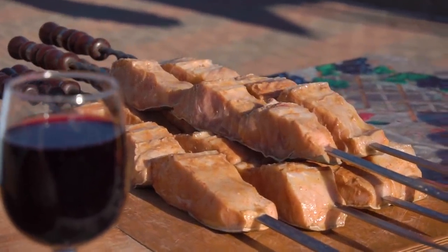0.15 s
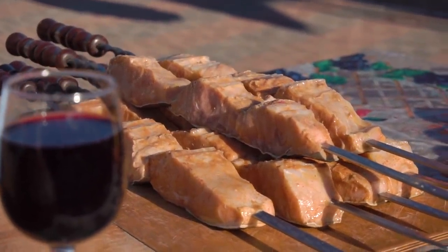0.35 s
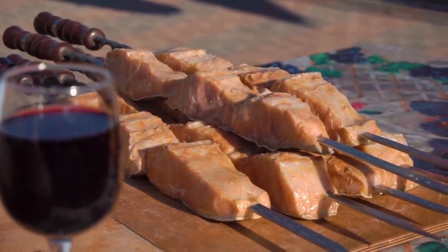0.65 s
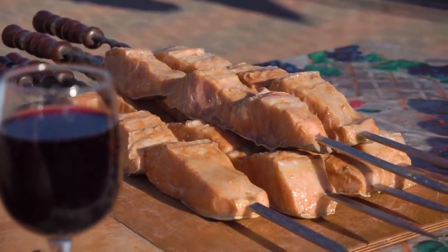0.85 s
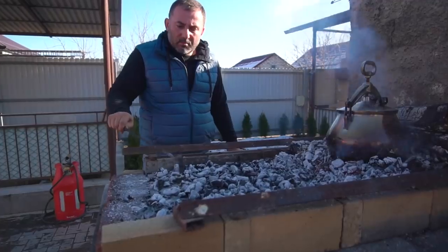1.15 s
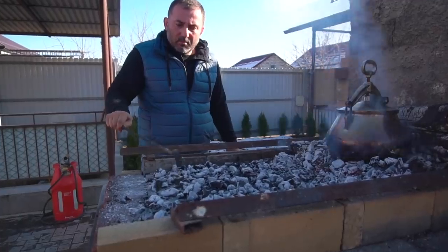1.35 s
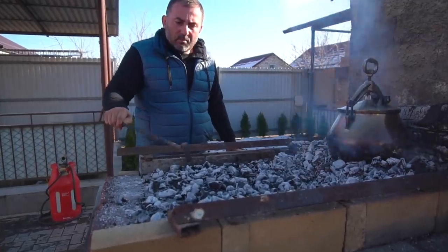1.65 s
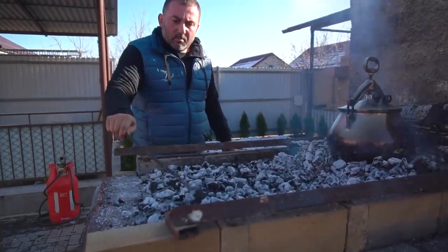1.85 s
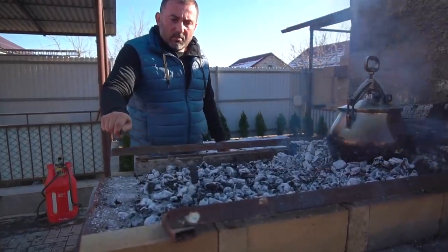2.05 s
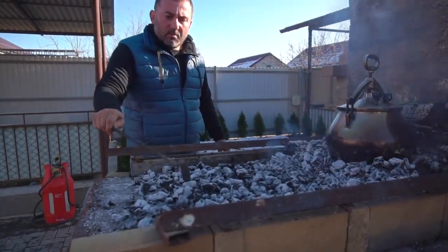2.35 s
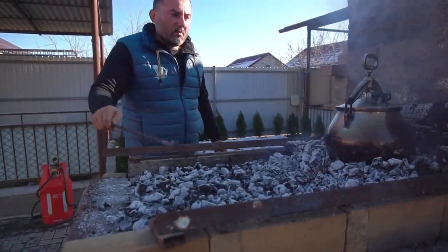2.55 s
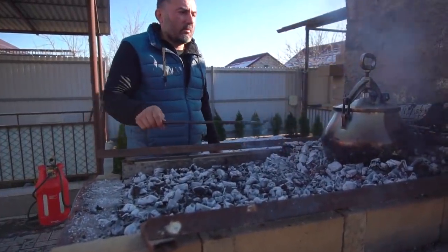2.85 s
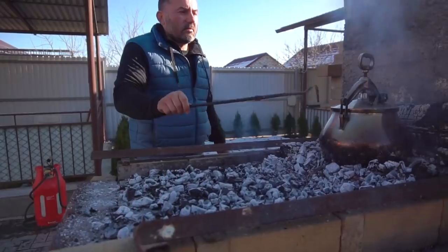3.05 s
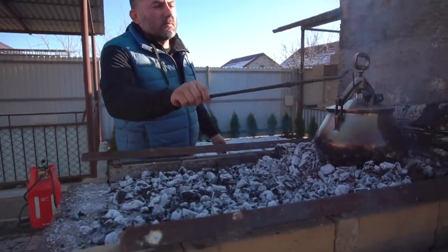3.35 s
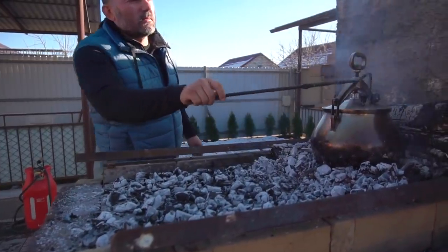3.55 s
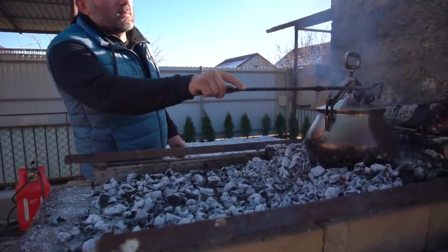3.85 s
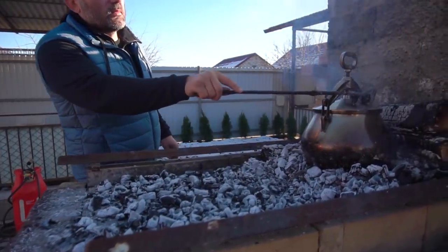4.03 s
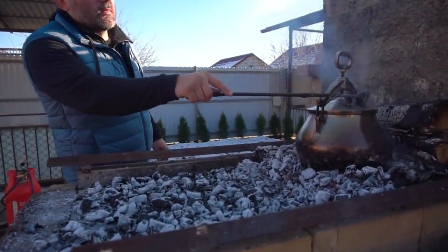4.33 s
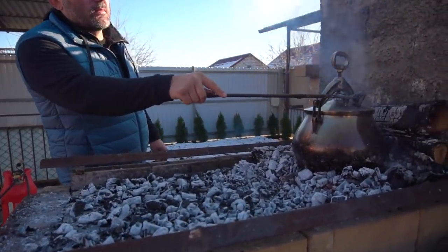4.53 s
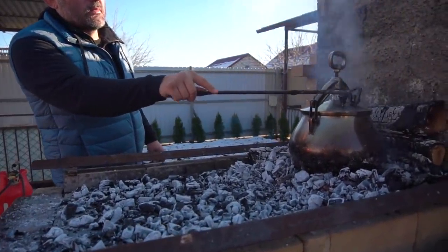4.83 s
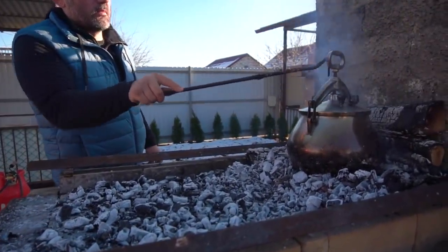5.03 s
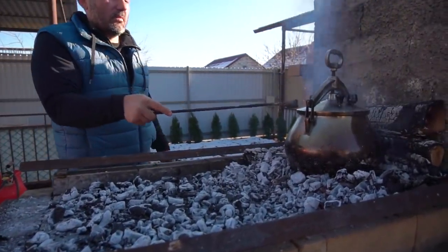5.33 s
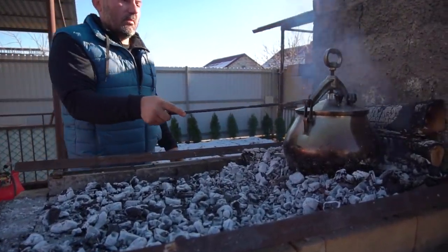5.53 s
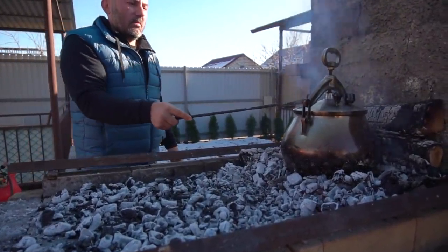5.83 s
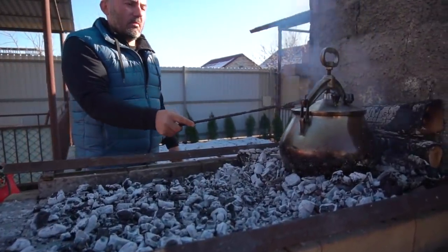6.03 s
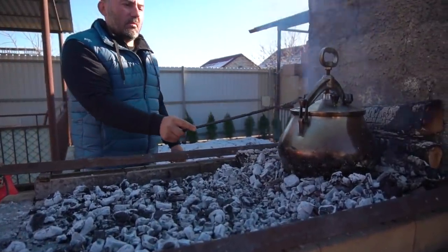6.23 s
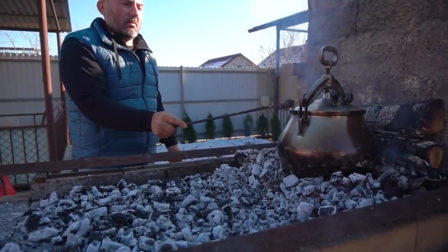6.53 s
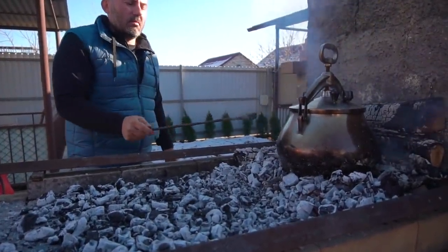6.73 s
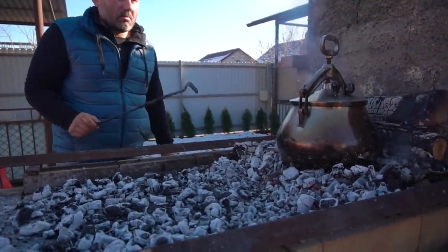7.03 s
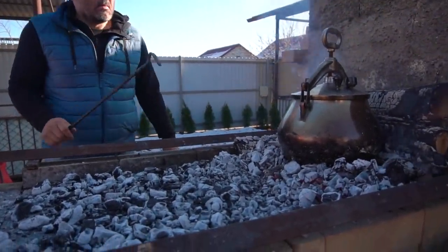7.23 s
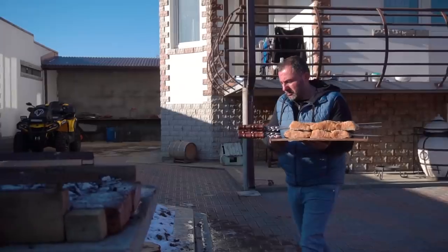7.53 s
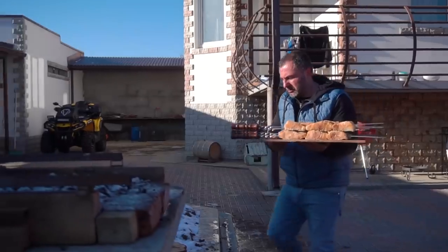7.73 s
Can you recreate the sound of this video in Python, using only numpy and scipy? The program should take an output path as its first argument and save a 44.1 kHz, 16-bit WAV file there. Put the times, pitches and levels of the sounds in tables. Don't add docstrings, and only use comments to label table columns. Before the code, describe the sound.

Quiet outdoor hum with ember ticks, then a cauldron hisses steam while a poker crunches coals and taps metal, releasing two roaring steam bursts.

```python
import sys
import numpy as np
from scipy import signal
from scipy.fft import rfft, irfft, next_fast_len
from scipy.io import wavfile
from scipy.ndimage import map_coordinates

SR = 44100
rng = np.random.default_rng(int(sys.argv[2]) if len(sys.argv) > 2 else 0)


def nominal_scale(level):
    x = np.asarray(level, float) / 20
    return 10 ** x


def log_audio(samples):
    frames = np.atleast_2d(samples).T
    limited = np.clip(frames, -1, 1)
    pcm = np.round(limited * 32767).astype(np.int16)
    wavfile.write(sys.argv[1], SR, pcm)


N = 347688
GRILL_S, FAR_S = 0.957, 7.51

# start_s, level_db
LEAK = [(0.96, -35), (1.1, -37.5), (1.48, -39.5), (1.65, -38), (2.2, -36), (2.48, -42.5), (2.63, -39),
        (2.76, -41), (3.0, -35.5), (3.27, -34.5), (3.7, -37), (3.9, -39.5), (4.9, -34.5), (5.35, -33.5),
        (5.6, -29.5), (6.5, -35), (7.45, -35), (7.6, -41)]
# start_s, held_s, level_db, release_s, yard_sinks_db
LIFTS = [
    (4.05, 0.022, -25.5, 0.026, -1),
    (4.104, 0.1, -33.5, 0.06, 0),
    (4.281, 0.585, -21.5, 0.03, 11.5),
    (5.631, 0.835, -20.5, 0.04, 4.5),
]
# middle_s, half_width_s, loss_db
CHOKES = [(4.26, 0.025, 2), (4.3, 0.025, -3), (4.333, 0.01, 6), (4.36, 0.04, -1.5), (5.636, 0.006, -3),
          (5.659, 0.011, 11), (5.69, 0.09, 3.5), (6.14, 0.08, 2), (6.44, 0.03, 2), (7.11, 0.06, -2.5)]
# pitch_hz, level_db (per Hz)
LEAK_COLOUR = [(710, -37), (1200, -12), (1460, -15.5), (2590, -17.5), (2890, -12), (3590, -11), (4500, -13),
               (4960, -7), (5710, -1.5), (6370, -5.5), (8630, -8), (10300, -21.5), (12700, -17.5),
               (14700, -11), (16000, -7)]
# pitch_hz, level_db (per Hz)
FAR_COLOUR = [(710, -40), (1200, -12), (3470, -11), (5300, 0), (7020, -3), (10500, -10), (13500, -13.5),
              (16000, -8)]
# pitch_hz, level_db (per Hz)
ROAR_COLOURS = [
    [(530, -70), (900, -39), (1280, -25), (2140, -25), (3960, -17.5), (4310, -17), (4740, -12), (5220, -8.5), (6640, 0), (11400, -5.5), (15100, 1.5), (16000, -12)],
    [(530, -59), (900, -32), (1120, -24.5), (3110, -16.5), (3550, -9.5), (3960, -10), (4410, -8.5), (6110, -0.5), (8050, 3), (11300, -11.5), (15100, -1), (16000, -13)],
]
# start_s, lag_ms, strength (0-1)
RIM_ECHO = [(0.94, 1.004, 0.4), (1.29, 1.004, 0.45), (1.55, 0.98, 0.5), (1.99, 1.056, 0.5),
            (2.42, 1.072, 0.38), (2.7, 1.022, 0.35), (3.15, 1.014, 0.28), (3.55, 1.092, 0.3),
            (3.95, 1.078, 0.15), (4.25, 1.036, 0.46), (5.0, 1.046, 0.48), (5.62, 1.012, 0.44),
            (5.66, 1.158, 0.4), (5.99, 1.104, 0.5), (6.4, 1.156, 0.22), (7.46, 1.192, 0.38),
            (7.5, 0.956, 0.2), (7.73, 0.964, 0.3)]
# extra_lag_ms, share (of its strength)
SIDE_ECHOES = [(0.179, 0.48), (-0.19, 0.25), (-0.276, 0.25), (0.882, 0.3)]
CRUNCH = {3.5: [(1.8989, -9.5, 660, -27.5, 1090), (1.9081, -10, 580, -24.5, 2200),
          (3.3237, -19.5, 267, -32, 2150), (1.2405, -9, 600, -27.5, 1640), (1.5235, -30, 202, -32, 2200),
          (1.5262, -16, 333, -27.5, 1140)], -6.5: [(1.9036, -13, 556, -27, 1500),
          (2.207, -18, 590, -24, 1320), (2.2208, -16.5, 560, -22.5, 2100), (3.2898, -22, 359.6, -27, 1230),
          (3.617, -25, 506, -33, 902), (7.522, -27, 280, -26.5, 1910), (1.2431, -9, 283, -25, 2190)]}
# start_s, grit_db, thud_hz, thud_db, knock_db
TAPS = [(4.0514, -28, 530, -29.5, -25), (4.0678, -30, 471, -33, -27), (4.106, -20, 466, -36, -29),
        (4.218, -44, 363, -52, -39), (4.85, -24, 361, -36, -33), (5.5043, -6.5, 482, -49, -10),
        (5.5466, -41, 474, -30.5, -26), (5.6307, -13, 377, -19, -16), (5.641, -18, 264, -43, -37),
        (6.424, -21.5, 172, -33, -23.5), (6.4445, -25, 248, -45, -32), (6.4607, -25, 180, -41, -25),
        (6.4743, -20.5, 312, -35, -27)]
# pitch_hz, level_db, fade_s (time to fall 60 dB)
LID_NOTES = [(305, -41, 0.78), (474, -21, 0.31), (893, -22.5, 0.14), (1246, -6, 0.084), (1383, -1.5, 0.031),
             (1585, -5, 0.024), (1810, 3.5, 0.015), (2170, -10, 0.015), (2436, -6.5, 0.057),
             (2950, -7, 0.056), (3360, -8.5, 0.036)]
TICKS = {(11000, 0.008): [(0.4316, -32, 1700, -14), (0.4547, -16.5, 1610, -8.5), (0.4579, -18, 1500, -21),
         (0.463, -25.5, 1500, -12), (0.466, -27.5, 1900, -7), (0.4844, -32, 1860, -14),
         (0.5213, -22, 1560, -23), (0.6964, -40, 1750, -14), (0.7157, -25.5, 1500, -14),
         (0.7204, -30, 1720, -14), (2.0328, -24, 4970, -18), (2.559, -25, 3530, -4),
         (2.9901, -19.5, 4600, -8), (5.724, -14.5, 4460, -11), (7.01, -24, 5130, -1)],
         (4500, 0.011): [(1.3124, -28, 1360, -3.5), (2.0024, -34, 2950, -5), (4.8564, -29, 2910, 6.5),
         (7.3435, -30.5, 1640, 0), (7.562, -20, 1720, -6), (7.5862, -28, 1730, -5), (7.691, -20, 2310, -6)],
         (7900, 0.031): [(7.4775, -10, 4300, -22)]}
# start_s, length_s, level_db, low_hz, top_hz
SCUFFS = [(3.288, 0.045, -36, 240, 620), (3.581, 0.19, -39, 330, 800), (7.52, 0.11, -40.5, 140, 2400),
          (5.545, 0.031, -40, 550, 1500), (6.425, 0.1, -41, 1300, 3000), (3.2, 0.26, -45, 1400, 4400),
          (3.55, 0.22, -44, 1500, 4900), (6.72, 0.42, -46, 1500, 4700), (2.88, 0.55, -47, 12500, 16000),
          (7.525, 0.2, -44, 130, 420), (1.65, 0.6, -50, 13000, 16000), (2.62, 0.4, -56, 2830, 2990)]
# start_s, rumble_db, hum_db
SPOTS = [
    (0, -30, -42),
    (0.96, -40.5, -48),
    (7.5, -40, -46),
]
# start_s, level_db
TRAFFIC = [(0.96, -1), (1.4, -3.5), (2.5, 0.5), (3.5, 2), (3.9, -2), (4.3, 1), (6.7, -3), (7.5, 1.5),
           (7.88, -2)]
# middle_s, half_width_s, loss_db
LULLS = [(0.03, .05, 4), (0.67, .05, 4.5), (0.9, .06, -4), (1.05, .08, 4), (1.53, .08, 14), (1.83, .04, 6),
         (2.43, .05, 5), (3.2, .05, 6), (3.35, .1, -3), (5.2, .07, 12), (5.45, .12, -4), (5.73, .05, 8),
         (6.1, .12, 8), (6.6, .15, 9), (6.35, .08, 8), (6.87, .04, 6), (7.29, .04, 9), (7.52, .05, 4)]
# pitch_hz, level_db (per Hz)
TABLE_HUM = [(35, -29), (60, 0), (148, -6), (214, -12), (309, -12), (347, -14), (408, -11), (539, -12),
             (1030, -10), (2010, -27), (2840, -31), (5180, -33.5), (7330, -32), (15000, -47.5)]
# pitch_hz, level_db (per Hz)
GRILL_HUM = [(35, -37), (60, -1), (195, -5), (226, -0.5), (270, -5.5), (303, -1), (340, -3), (823, -3),
             (893, -0.5), (1720, -13.5), (2590, -14.5), (3000, -7.5), (3900, -42), (6600, -120)]
# pitch_hz, level_db
EMBER_TONES = [(306.8, -59.5), (549.1, -80), (2207, -69.5), (2907, -65)]
# pitch_hz, level_db (per Hz)
RUMBLE = [(12, 1), (20, -4), (31, -3.5), (44, -17), (56, -17.5), (75, -31)]


def steam():
    core_db, swing_db = valve()
    white = rng.standard_normal(N)
    puffs_db = drift(220)
    jet = with_echo(white * nominal_scale(puffs_db))
    opening = np.clip((core_db + 28.5) / 10, 0, 1)
    near = np.arange(N) < FAR_S * SR
    first_lift = np.arange(N) < 5.2 * SR
    low_db = -15 - 0.5 * opening - 0.75 * swing_db
    top_db = -7.5 + 0.5 * opening - 0.3 * swing_db + 1.5 * ~near
    out = 0
    for low_hz, high_hz, db in [(900, 4500, low_db), (4500, 10000, 0), (10000, 17000, top_db)]:
        first, second = [coloured(jet, colour, low_hz, high_hz) for colour in ROAR_COLOURS]
        roar = np.where(first_lift, first, second)
        near_leak = coloured(jet, LEAK_COLOUR, low_hz, high_hz)
        far_leak = coloured(jet, FAR_COLOUR, low_hz, high_hz)
        leak = np.where(near, near_leak, far_leak)
        out = out + nominal_scale(db) * ((1 - opening) * leak + opening * roar)
    out = mottled(out, patchy_db=2.5, rate_hz=3.2)
    flutter_db = 0.6 * drift(17)
    return out * nominal_scale(core_db + flutter_db) * (np.arange(N) >= GRILL_S * SR)


def valve():
    t = np.arange(N) / SR
    leak_db = in_time(LEAK)[0]
    lifted = 0
    for s, held, db, release, _ in LIFTS:
        times = [-1e-3, 0, 0.005, held, held + release, held + release + 0.01]
        shape_db = np.interp(t - s, times, [-80, -22, 0, 0, -22, -80])
        lifted = lifted + nominal_scale(2 * (db + shape_db))
    power = nominal_scale(2 * leak_db) + lifted
    choke_db = dips(CHOKES)
    swing_db = (leak_db + 37) * (1 - lifted / power) + choke_db
    return 10 * np.log10(power) + choke_db, swing_db


def with_echo(x):
    lag_ms, strength = in_time(RIM_ECHO)
    lag_ms = lag_ms + 0.009 * drift(11)
    dull_hz = 9300
    dull = signal.sosfilt(signal.butter(2, dull_hz, fs=SR, output="sos"), x)
    filter_ms = 215 / dull_hz

    def late(ms):
        return map_coordinates(dull, [np.arange(N) - (ms - filter_ms) * SR / 1000], order=3)

    bounces = late(lag_ms)
    for extra_ms, share in SIDE_ECHOES:
        bounces = bounces + share * late(lag_ms + extra_ms)
    return x + 1.12 * strength * bounces


def mottled(x, patchy_db, rate_hz):
    size = next_fast_len(N)
    spectrum = rfft(x, size)
    place = np.arange(size // 2 + 1) * SR / size / 1200
    out = np.zeros(N)
    for k in range(15):
        hill = np.clip(1 - np.abs(place - k), 0, 1)
        out += nominal_scale(patchy_db * drift(rate_hz)) * irfft(spectrum * hill, size)[:N]
    return out


def blows(table, grit_hz, grit_s, tail, thud_cycles, knock_cycles):
    t = np.arange(SR // 4) / SR
    out = np.zeros(N + SR)
    for s, grit_db, thud_hz, thud_db, knock_hz, knock_db in table:
        draw = rng.standard_normal((2, len(t)))
        uneven = draw[0] * (0.3 + (np.abs(draw[1]) > 1.9))
        clicks = uneven * (np.exp(-(t / grit_s) ** 2) + tail * np.exp(-t / 0.014))
        grit = band(clicks, 1390, 1.44 * grit_hz) + 0.46 * band(clicks, 0.64 * grit_hz, 1.28 * grit_hz)
        add(out, s, grit, grit_db)
        thud = ring(clicks, thud_hz, thud_cycles / thud_hz) + 0.3 * band(clicks, 120, 800)
        add(out, s, thud, thud_db)
        knock = band(ring(clicks, knock_hz, knock_cycles / knock_hz), 480, 4400)
        add(out, s, knock + 0.23 * band(clicks, 700, 2500), knock_db)
    return out[:N]


def lid():
    taps = np.array(TAPS)
    at = np.round(taps[:, 0] * SR).astype(int)
    out = np.zeros(N)
    spread_db = 3.1 * rng.standard_normal((len(taps), len(LID_NOTES)))
    for k, (hz, db, fade_s) in enumerate(LID_NOTES):
        tap_db = taps[:, 4] if hz < 2000 else taps[:, 1]
        clicks = np.zeros(N)
        clicks[at] = nominal_scale(tap_db + db - 6.5 + spread_db[:, k])
        out += (-1) ** k * ring(clicks, hz, fade_s)
    return out


def ticks():
    t = np.arange(SR // 10) / SR
    out = np.zeros(N + SR)
    for (top_hz, fade_s), rows in TICKS.items():
        for s, db, ring_hz, ring_db in rows:
            crack = 0.15 * rng.standard_normal(len(t)) * nominal_scale(-60 * t / fade_s) - (t == 0)
            add(out, s, band(crack, 1450, top_hz), db)
            add(out, s, ring(crack, ring_hz, 1.5 * fade_s), db + ring_db)
    return out[:N]


def scuffs():
    out = np.zeros(N)
    for s, length, db, low_hz, top_hz in SCUFFS:
        swell = np.sin(np.pi * np.clip((np.arange(N) / SR - s) / length, 0, 1) ** 0.5)
        level = nominal_scale(db + 1.1 * drift(120))
        grit = rms_one(band(rng.standard_normal(N), low_hz, top_hz))
        out += level * swell * grit
    return out


def yard():
    rumble_db, hum_db = yard_levels()
    at_grill = np.arange(N) >= GRILL_S * SR
    white = rng.standard_normal((3, N))
    grill_hum = nominal_scale(2.0) * coloured(white[0], GRILL_HUM)
    table_hum = nominal_scale(4.5) * coloured(white[0], TABLE_HUM)
    hum = np.where(at_grill, grill_hum, table_hum)
    notes = sum(nominal_scale(db + 47.5) * rms_one(ring(white[1], hz, 0.27)) for hz, db in EMBER_TONES)
    hum = (hum + at_grill * notes) * nominal_scale(hum_db + 2.07 * drift(5.3))
    throb_hz = 30.1 + 3.39 * drift(3.41)
    throb = np.sqrt(2) * np.sin(2 * np.pi * np.cumsum(throb_hz) / SR)
    throb = nominal_scale(-4.0 + 1.7 * drift(15)) * throb
    rough = nominal_scale(-6.5) * coloured(white[2], RUMBLE)
    return hum + nominal_scale(rumble_db) * (throb + rough)


def yard_levels():
    t = np.arange(N) / SR
    spots = np.array(SPOTS)
    rumble_db, hum_db = spots[np.searchsorted(spots[:, 0], t, "right") - 1, 1:].T
    sunk_db = 0
    for s, held, _, _, db in LIFTS:
        down = min(0.3, held / 2)
        rise = max(held - 0.05, held / 2 + 1e-3)
        sunk_db = sunk_db + np.interp(t - s, [0, down, rise, held + 0.04], [0, -db, -db, 0])
    rumble_db = rumble_db + 1.2 * sunk_db + dips(LULLS)
    return rumble_db, hum_db + sunk_db + in_time(TRAFFIC)[0]


def rms_one(x):
    return x / np.sqrt(np.mean(x ** 2) + 1e-20)


def in_time(rows):
    s, *columns = np.transpose(sorted(map(tuple, rows)))
    return [np.interp(np.arange(N) / SR, s, c) for c in columns]


def dips(rows):
    t = np.arange(N) / SR
    return -sum(db * np.exp(-((t - s) / width) ** 2) for s, width, db in rows)


def drift(rate_hz):
    r = np.exp(-2 * np.pi * rate_hz / SR)
    smooth = signal.lfilter([1], [1, -2 * r, r * r], rng.standard_normal(N + SR))
    return rms_one(smooth[SR:])


def coloured(x, spectrum, low_hz=1, high_hz=30000):
    size = next_fast_len(N)
    hz = np.maximum(np.arange(size // 2 + 1) * SR / size, 1)
    point_hz, point_db = np.transpose(spectrum)
    gain = nominal_scale(np.interp(np.log(hz), np.log(point_hz), point_db, left=-90, right=-90))
    edges = np.sqrt((1 + (low_hz / hz) ** 16) * (1 + (hz / high_hz) ** 16))
    return rms_one(irfft(rfft(x, size) * gain / edges, size)[:N])


def ring(clicks, hz, fade_s):
    r = nominal_scale(-60 / (fade_s * SR))
    w = 2 * np.pi * hz / SR
    return signal.lfilter([0, np.sin(w)], [1, -2 * r * np.cos(w), r * r], clicks + 1e-18)


def band(x, low_hz, high_hz):
    edges = [low_hz, min(high_hz, 16000)]
    return signal.sosfilt(signal.butter(2, edges, "band", fs=SR, output="sos"), x)


def add(out, s, sound, db):
    at = round(s * SR)
    out[at:at + len(sound)] += nominal_scale(db) * sound / np.abs(sound).max()


def scene():
    crunch = [(*row, row[3] + over_db) for over_db, rows in CRUNCH.items() for row in rows]
    coal = ticks()
    coal = coal + blows(crunch, grit_hz=6370, grit_s=0.0057, tail=0.24, thud_cycles=13.0, knock_cycles=22.0)
    taps = [(*row[:4], 1230, row[4]) for row in TAPS]
    metal = blows(taps, grit_hz=2720, grit_s=0.0046, tail=0.03, thud_cycles=10.6, knock_cycles=15.5)
    metal = metal + band(lid(), 300, 16000)
    return np.tile(steam() + yard() + coal + metal + scuffs(), (2, 1))


def band_limit(x):
    return signal.sosfilt(signal.butter(12, 16950, fs=SR, output="sos"), x)


def record(dry):
    rounded = 0.76 * np.tanh(dry / 0.83)
    top_cut = signal.cheby2(18, 60, 16150, fs=SR, output="sos")
    mix = signal.sosfilt(top_cut, rounded)
    return band_limit(mix)


dry = scene()
out = record(dry)
log_audio(out)
```